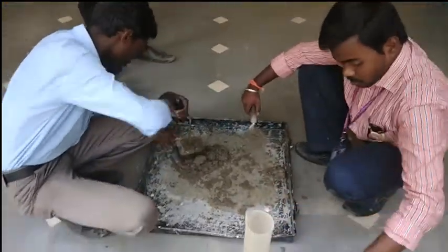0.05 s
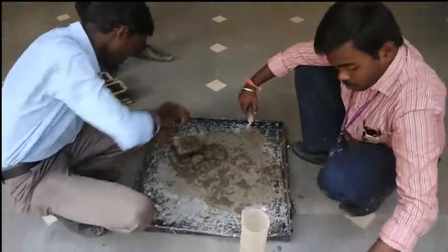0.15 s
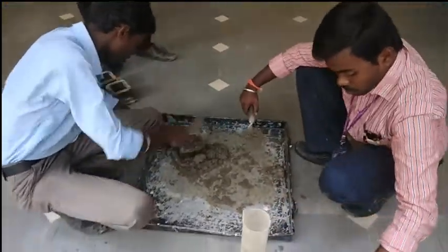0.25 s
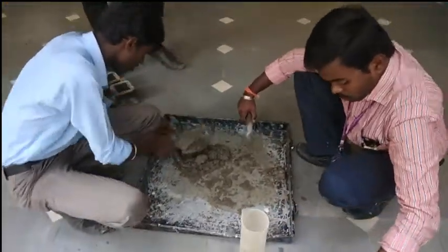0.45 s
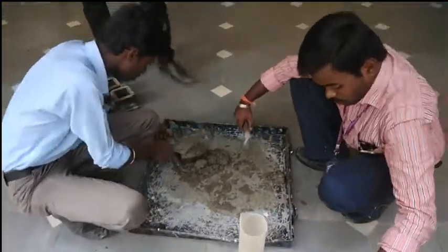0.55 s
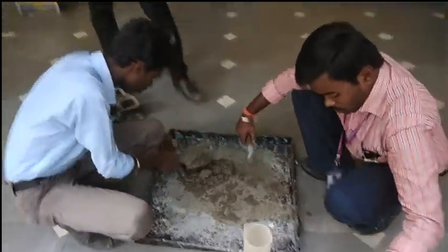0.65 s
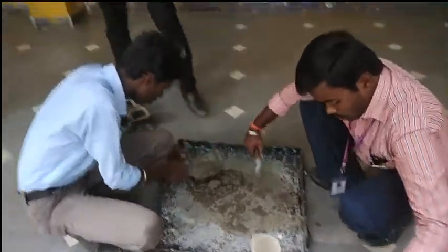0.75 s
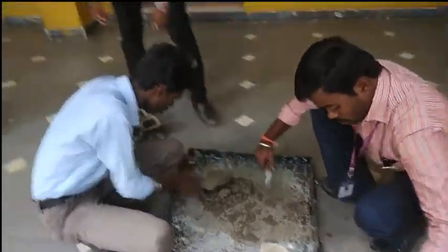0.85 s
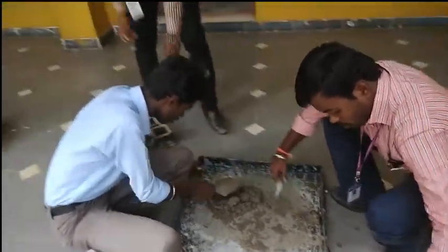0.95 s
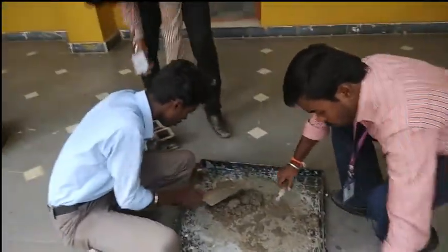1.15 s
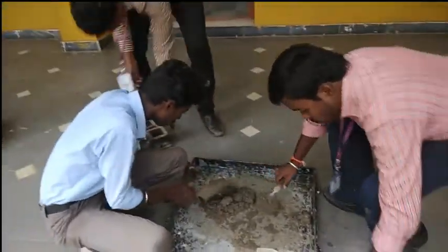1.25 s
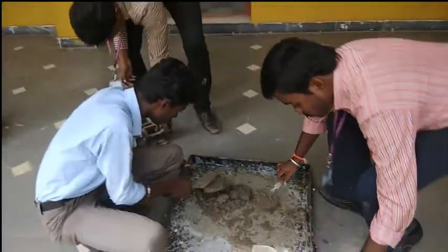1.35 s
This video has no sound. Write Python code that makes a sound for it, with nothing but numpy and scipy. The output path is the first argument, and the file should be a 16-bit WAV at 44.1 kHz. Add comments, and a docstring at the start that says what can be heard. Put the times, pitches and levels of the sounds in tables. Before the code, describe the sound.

In a large room with light echo, a metal tray knocks against the hard floor in a quick, dull clatter. Close by, small trowels follow with short, hissing scrapes through gritty wet mortar, faintly ringing the metal.

```python
"""A metal tray of wet mortar is knocked and clunks down on the hard floor of a large room.
Each blow cracks grit, booms the whole tray and rings its sheet, choked by the mortar.
Then small steel trowels mix by hand: short, juddering strokes that hiss and rasp through
the sand and ring the metal. Faint squeaks, soft shoves of mortar and room air sit underneath."""
import sys
import numpy as np
from scipy import signal
from scipy.fft import rfft, irfft, next_fast_len
from scipy.io import wavfile
from scipy.ndimage import map_coordinates

SR = 44100
rng = np.random.default_rng(int(sys.argv[2]) if len(sys.argv) > 2 else 0)


def waveform_to_disk(signal):
    """Save audio, clipped to [-1, 1], as 16-bit WAV at the path in sys.argv[1]."""
    frames = np.transpose(np.atleast_2d(signal))
    scaled = np.clip(frames, -1, 1) * 32767
    samples = np.round(scaled).astype(np.int16)
    wavfile.write(sys.argv[1], SR, samples)


N = 61739

# blows on the tray (t/s, ring level/dB, drive low cut/Hz, drive high cut/Hz,
# crack level/dB, crack decay/s, crack high cut/Hz, boom level/dB)
BLOWS = [(0.2363, -6.5, 313, 1360, -21, 0.0029, 7960, -30),
         (0.2775, -1.5, 1330, 3500, -12, 0.0019, 13150, -29),
         (.2905, -18.5, 338, 2500, -18, 0.0031, 6130, -28),
         (0.2966, -18.5, 294.3, 950, -21, 0.0019, 18000, -9),
         (0.331, -26.5, 920, 3500, -30.5, 0.0018, 8020, -48),
         (0.414, -29.5, 197, 550, -29.5, 0.0041, 3000, -50)]
SHEET_MODES = [(238, -5, .06), (316, -8.5, 0.07), (347.4, -7, 0.074), (375, -18, 0.1), (547, -7.5, .035),
               (795, -10, 0.031), (972.7, -12, 0.098), (1190, 5.5, 0.016), (1281, 8, 0.014),
               (1439, -1.5, 0.02), (2105, 2.5, 0.019), (2187, 3, 0.019), (2305, -8, .03)]  # sheet damped by mortar (f/Hz, level/dB, t60/s)
BOOM_MODES = [(73.4, -14.5, 0.076), (128, -14, 0.11), (164.4, 4, 0.049), (255, 0.5, 0.039)]  # the tray moving as a whole (f/Hz, level/dB, t60/s)
MODE_PAN = [(300, 0), (1250, -1), (2100, -1.5)]  # where the modes sit (f/Hz, left over right/dB)
CRACK_EQ = [(100, 1), (900, 4.5), (2200, -17), (2900, -0.5), (4500, 3), (6400, -1.5), (7300, -7.5),
            (10500, -0.5), (14000, -10), (15600, -21.5)]  # grit crushed by a blow (f/Hz, level/dB)
# trowel strokes (t/s, attack/s, hold/s, hiss level/dB, rasp level/dB, blade pitch/Hz,
# sheet level/dB, hiss left over right/dB)
TROWEL_STROKES = [(-.03, 0.01, 0.025, -41, -74, 6500, -83, 6.5),
                  (0.014, 0.0061, 0.0083, -52, -73, 4600, -92, 8),
                  (0.502, 0.0084, 0.12, -63.5, -78, 5330, -92, 11),
                  (0.655, 0.036, 0.043, -42, -56, 5440, -61, 4.5),
                  (0.744, 0.0092, .015, -33.5, -39, 3920, -74, 4),
                  (0.768, 0.0049, 0.036, -47, -56, 4000, -60.5, 9),
                  (0.8355, 0.0069, 0.018, -31, -45, 3310, -40, 5.5),
                  (0.894, .03, 0.028, -39, -45.5, 5500, -52, 4),
                  (0.934, 0.026, .022, -33.5, -42.5, 5170, -42.5, 4.5),
                  (1.035, .004, .007, -39.5, -48.5, 3170, -43.5, 5.5),
                  (1.049, 0.0043, 0.021, -33, -42.5, 2870, -40, 3),
                  (1.076, 0.029, 0.048, -31.5, -39.5, 3780, -48.5, 2.5),
                  (1.169, .01, 0.028, -43, -50, 4830, -55.5, 2),
                  (1.211, 0.014, 0.0095, -40.5, -57.5, 3400, -62, 8.5),
                  (1.252, 0.0058, 0.032, -56.5, -71.5, 3400, -85, 5.5)]
HISS_EQ = [(1000, -66), (4000, -18), (6800, -11.5), (7800, -1), (9300, -1.5), (10300, 0.5), (11800, 3),
           (13200, 0), (14200, -10.5), (15400, -2)]  # bright top of sand under the blade (f/Hz, level/dB)
RASP_EQ = [(100, -42), (300, -24.5), (1000, -18), (1800, -5), (2700, -1), (3300, 4), (4300, 0.5), (5400, 5),
           (6600, -6.5), (9000, -12)]  # its rough midrange (f/Hz, level/dB)
SCRAPED_MODES = [(1413, 107, -5), (1626, 170, -8.5), (1988, 89, 3), (2228, 120, 4.5), (3120, 290, -5.5)]  # sheet rung by the blade (f/Hz, width/Hz, level/dB)
COARSE_GRAINS = [(0.709, -47, -53), (0.7515, -32.5, -39), (0.8417, -35.5, -26), (0.8474, -37, -31.5),
                 (0.8607, -33.5, -53), (0.953, -36, -31), (0.9687, -31.5, -52), (.978, -37.5, -30),
                 (1.0411, -23.5, -35), (1.0667, -39.5, -38), (1.109, -34.5, -32), (1.236, -29.5, -38.5)]  # grains cracking under the blade (t/s, click level/dB, crunch level/dB)
SQUEAK_TONES = [(0.196, 0.031, 365, -59), (.745, 0.05, 379, -62), (1.032, .02, 797, -60),
                (1.056, .03, 1230, -52), (1.15, 0.051, 767, -59.5), (1.117, 0.12, 1442, -54),
                (1.302, 0.033, 1072, -65.5)]  # brief faint tones (t/s, length/s, f/Hz, level/dB)
MORTAR_SHOVES = [(0.839, 0.027, 86, -80), (0.949, 0.059, 305, -64.5)]  # wet mortar pushed aside (t/s, length/s, f/Hz, level/dB)
REVERB_DECAY = [(100, 0.8), (300, 0.34), (700, 0.4), (1250, 0.58), (1750, 0.57), (2150, 0.62), (2800, 0.52),
                (5000, 0.65), (10000, 0.6), (16000, 0.65)]  # how long the room rings (f/Hz, t60/s)
REVERB_EQ = [(60, -18), (170, 1.5), (300, -5), (450, 3), (800, 0), (1300, -6), (2200, -3), (4000, -4),
             (8000, -3.5), (15000, -5)]  # colour of the reflections (f/Hz, level/dB)
STEREO_LIKENESS = [(100, .99), (400, .88), (800, 0.22), (1400, .15), (5000, 0.01)]  # diffuse sound in the room (f/Hz, left-right correlation)
AIR_EQ = [(30, -21), (75, -25), (140, 0.5), (260, 0.5), (600, -6), (1400, -13), (4000, -12), (15000, -24.5)]  # room tone (f/Hz, level/dB)

RING_RISE_S, BOOM_RISE_S, RING_LAG_S, LEFT_LEADS_S = 0.002, 0.0059, 0.0007, 0.00011
RELEASE_S, GRAINS_PER_S, GRAIN_SPREAD_DB, JUDDER_DB, JUDDER_PER_S = 0.012, 6900, 2, 1, 170
BLADE_PEAK_DB, BLADE_WIDTH_HZ, BLADE_RIPPLE_DB, RIPPLE_STEP_HZ = 4.5, 380, 4, 220
TROWEL_DB, RASP_PAN_DB, SHEET_PAN_DB = -0.5, -2, -2.9
TICK_S, CRUNCH_TOP_HZ = 0.0014, 3830
SQUEAK_WAVER_HZ, SHOVE_WIDTH_OCT = 32, 0.39
PREDELAY_S, EARLY_DB, EARLY_S, AIR_DB = 0.0091, 4.5, 0.05, -68
LOW_CUT_HZ, TOP_HZ = 75, 15850


def tray_knocks():
    """Each blow rings the sheet, booms the whole tray and cracks grit, all into the room."""
    out = np.zeros((2, N))
    for s, ring_db, low_hz, high_hz, crack_db, crack_s, crack_hz, boom_db in BLOWS:
        drive = lambda hz: rolloff(low_hz / hz) * rolloff(hz / high_hz)
        ring = amp(ring_db) * struck_modes(SHEET_MODES, s + RING_LAG_S, RING_RISE_S, drive)
        boom = amp(boom_db) * struck_modes(BOOM_MODES, s, BOOM_RISE_S)
        crack = filtered(grit_crack(s, crack_s, CRACK_EQ), lambda hz: rolloff(hz / crack_hz))
        out += in_room(ring, wet_db=-1) + in_room(boom, wet_db=-4.5)
        out += in_room(amp(crack_db) * crack, wet_db=-2.5)
    return out


def struck_modes(modes, s, rise_s, drive=lambda hz: 1):
    """Damped modes struck together, reaching the left side first."""
    t = np.array([since(s), since(s + LEFT_LEADS_S)])
    out = np.zeros((2, N))
    for hz, db, t60 in modes:
        gain = drive(hz) * amp(db + rng.normal(0, 1)) * pan(along(MODE_PAN, hz))
        out += gain * amp(-60 * t / t60) * np.sin(2 * np.pi * hz * t)
    return out * (1 - np.exp(-t / rise_s))


def grit_crack(s, decay_s, eq):
    """Crushed grit: a snap of noise with a steely colour."""
    age = since(s) / decay_s
    envelope = 2 * np.sqrt(age) * np.exp(-age ** 0.84)
    return envelope * steel_colour(coloured(rng.standard_normal((2, N)), eq), ripple_db=3.5)


def trowel_strokes():
    """The blade judders sand across the sheet and sings at a pitch set by its grip."""
    hiss, rasp = coloured(sand_grains(), HISS_EQ), coloured(sand_grains(), RASP_EQ)
    sheet = unit(filtered(sand_grains()[0], sheet_response)) * pan(SHEET_PAN_DB)
    judder = amp(JUDDER_DB * wobble(JUDDER_PER_S))
    out = np.zeros((2, N))
    for s, attack_s, hold_s, hiss_db, rasp_db, blade_hz, sheet_db, pan_db in TROWEL_STROKES:
        push = np.minimum(since(s) / attack_s, 1) * np.exp(-since(s + attack_s + hold_s) / RELEASE_S)
        blade_peak = lambda hz: amp(BLADE_PEAK_DB / (1 + ((hz - blade_hz) / BLADE_WIDTH_HZ) ** 2))
        singing = filtered(rasp, blade_peak)
        top = amp(hiss_db) * pan(pan_db) * steel_colour(hiss, BLADE_RIPPLE_DB)
        mids = amp(rasp_db) * pan(RASP_PAN_DB) * steel_colour(singing, BLADE_RIPPLE_DB)
        out += push * judder * (top + mids + amp(sheet_db) * sheet)
    return out


def sand_grains():
    """Dense tiny impacts from grains of uneven size."""
    hits = rng.random((2, N)) < GRAINS_PER_S / SR
    return hits * rng.standard_normal((2, N)) * amp(GRAIN_SPREAD_DB * rng.standard_normal(N))


def sheet_response(hz):
    """The scraped sheet as a bank of resonators of alternating polarity."""
    return sum((-1) ** k * amp(db) * 1j * hz * width / (centre ** 2 - hz ** 2 + 1j * hz * width)
               for k, (centre, width, db) in enumerate(SCRAPED_MODES))


def steel_colour(x, ripple_db):
    """The many close resonances of a steel blade, new for each contact."""
    peaks = rng.standard_normal(1000)
    ripple = lambda hz: amp(ripple_db * map_coordinates(peaks, [hz / RIPPLE_STEP_HZ], mode="mirror"))
    return unit(filtered(x, ripple))


def grain_ticks():
    """Coarse grains crack under the blade: a bright click over a darker crunch."""
    clicks = sum(amp(db) * grit_crack(s, TICK_S, HISS_EQ) for s, db, _ in COARSE_GRAINS)
    crunch = sum(amp(db) * grit_crack(s, TICK_S, RASP_EQ) for s, _, db in COARSE_GRAINS)
    return clicks + filtered(crunch, lambda hz: rolloff(hz / CRUNCH_TOP_HZ, order=4))


def squeaks():
    """Faint wavering tones swell and fade among the strokes."""
    out = np.zeros(N)
    for s, length_s, hz, db in SQUEAK_TONES:
        pitch = hz + SQUEAK_WAVER_HZ * wobble(per_s=220)
        out += amp(db) * np.sin(2 * np.pi * np.cumsum(pitch) / SR) * swell(s, length_s)
    return out


def mortar_shoves():
    """Heavy wet mortar gives way with a soft, low push."""
    out = np.zeros(N)
    for s, length_s, centre_hz, db in MORTAR_SHOVES:
        band = lambda hz: np.exp(-0.5 * (np.log2((hz + 1) / centre_hz) / SHOVE_WIDTH_OCT) ** 2)
        out += amp(db) * unit(filtered(rng.standard_normal(N), band)) * swell(s, length_s)
    return out


def in_room(x, wet_db, tail_share=1):
    """Direct sound plus the reverb of hard walls and floor, early reflections lifted."""
    hz, t, bands = signal.stft(diffuse_noise(), SR, nperseg=256)
    t60 = np.maximum(tail_share * along(REVERB_DECAY, hz), 0.05)[:, None]
    fade = amp(-60 * t / t60 + along(REVERB_EQ, hz)[:, None])
    fade *= np.sqrt(np.log(1e6) / (t60 * SR))  # a longer decay adds no energy
    tail = signal.istft(bands * fade, SR, nperseg=256)[1][:, :N]
    age = since(PREDELAY_S)
    tail *= (1 - np.exp(-age / 0.0023)) * amp(EARLY_DB * np.exp(-age / EARLY_S))
    return x + amp(wet_db) * signal.fftconvolve(x, tail, axes=1)[:, :N]


def room_air():
    """A quiet, steady bed of room tone."""
    return amp(AIR_DB) * coloured(diffuse_noise(), AIR_EQ)


def diffuse_noise():
    """Noise from all around: centred in the bass, wide in the treble."""
    def mid_side(hz):
        angle = np.arccos(np.clip(along(STEREO_LIKENESS, hz), -1, 1)) / 2
        return np.array([np.cos(angle), np.sin(angle)])
    mid, side = filtered(rng.standard_normal((2, N)), mid_side)
    return np.array([mid + side, mid - side])


def amp(db):
    """Decibels to gain."""
    return 10 ** (np.asarray(db) / 20)


def unit(x):
    """Scaled to rms 1."""
    return x / np.sqrt(np.mean(x ** 2) + 1e-20)


def along(points, hz):
    """A curve of (f/Hz, value) points, read on a log axis."""
    f, values = np.transpose(points)
    return np.interp(np.log(hz + 1), np.log(f + 1), values)


def since(s):
    """Seconds after a cue, zero before it."""
    return np.maximum(np.arange(N) / SR - s, 0)


def swell(s, length_s):
    """A half-sine fade in and out."""
    return np.sin(np.pi * np.minimum(since(s) / length_s, 1))


def wobble(per_s):
    """A modulator gliding between random values."""
    return np.interp(since(0) * per_s, np.arange(N), rng.standard_normal(N))


def pan(db):
    """Stereo gains; positive leans left."""
    return amp(np.array([[db], [-db]]) / 2)


def rolloff(ratio, order=2):
    """Butterworth gain, falling as the frequency ratio passes 1."""
    return 1 / np.sqrt(1 + ratio ** (2 * order))


def filtered(x, response):
    """x through a complex frequency response."""
    size = next_fast_len(N + SR // 2)
    return irfft(rfft(x, size) * response(np.fft.rfftfreq(size, 1 / SR)), size)[..., :N]


def coloured(x, eq):
    """x through an EQ curve, at rms 1."""
    return unit(filtered(x, lambda hz: amp(along(eq, hz))))


def scene():
    """Tray knocks and trowel work over the air of the room."""
    knocks = tray_knocks()
    mixing = amp(TROWEL_DB) * (trowel_strokes() + grain_ticks()) + squeaks() + mortar_shoves()
    # light strokes leave a shorter tail than blows, which also set the sheet shivering
    return knocks + in_room(mixing, wet_db=-2.5, tail_share=0.72) + room_air()


def record(dry):
    """Output chain: low cut, soft clip on the highest peaks, brick-wall high cut."""
    thin = signal.sosfilt(signal.butter(2, LOW_CUT_HZ, "highpass", fs=SR, output="sos"), dry)
    rounded = thin / (1 + np.abs(thin / 0.9) ** 6) ** (1 / 6)
    return filtered(rounded, lambda hz: hz < TOP_HZ)


dry = scene()
out = record(dry)
waveform_to_disk(out)
```